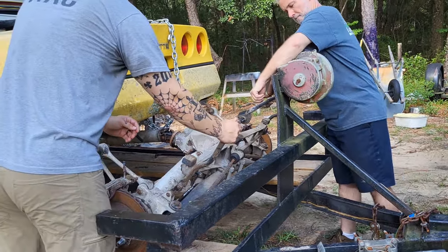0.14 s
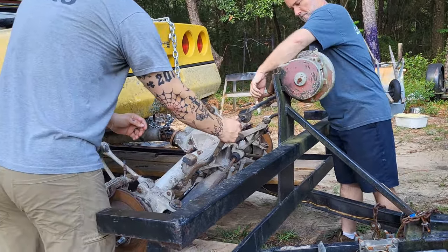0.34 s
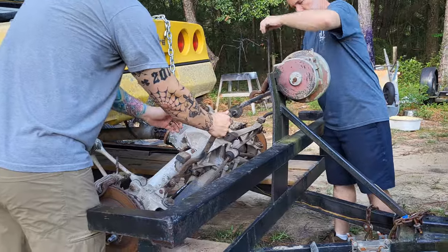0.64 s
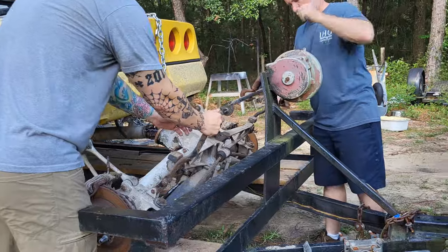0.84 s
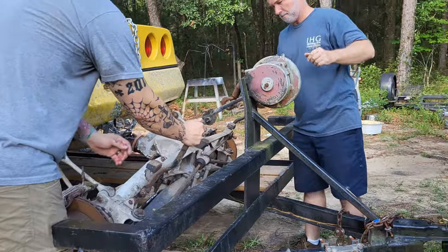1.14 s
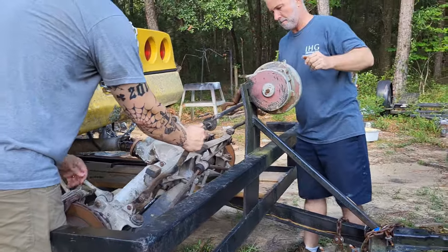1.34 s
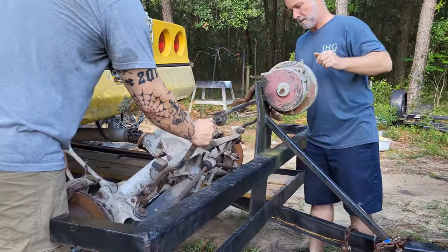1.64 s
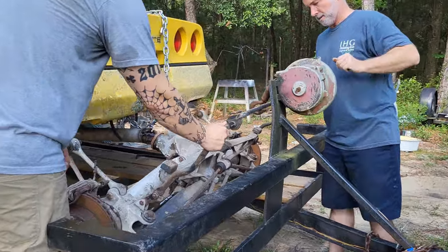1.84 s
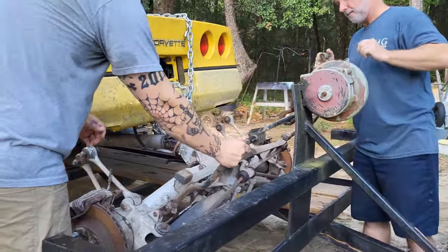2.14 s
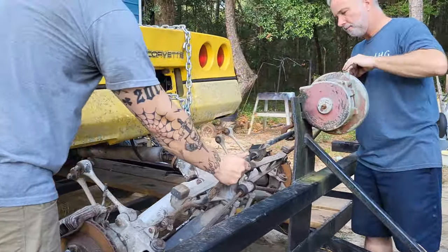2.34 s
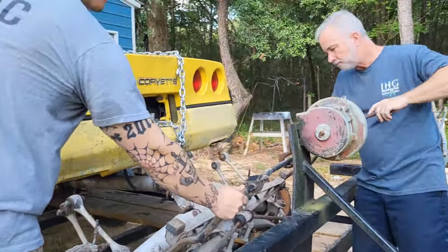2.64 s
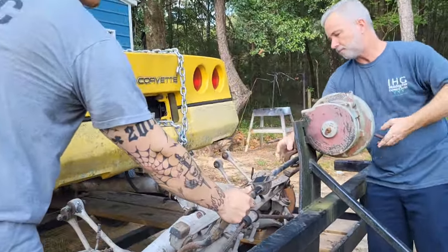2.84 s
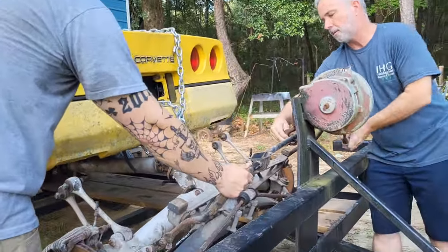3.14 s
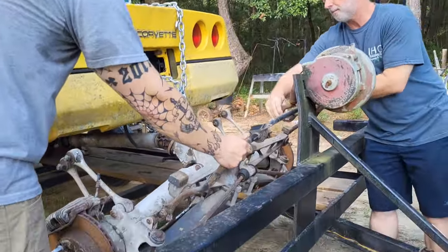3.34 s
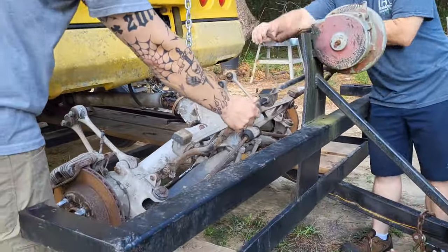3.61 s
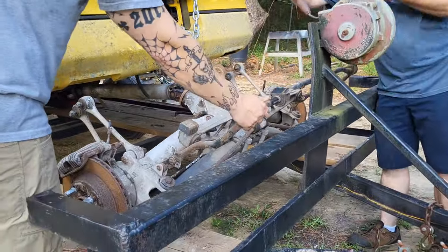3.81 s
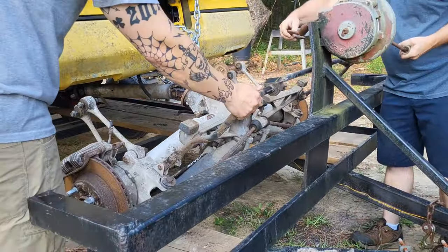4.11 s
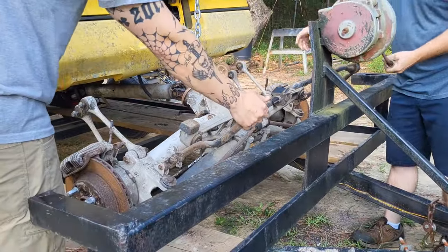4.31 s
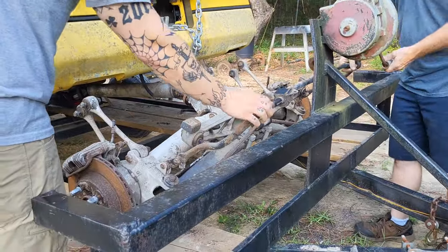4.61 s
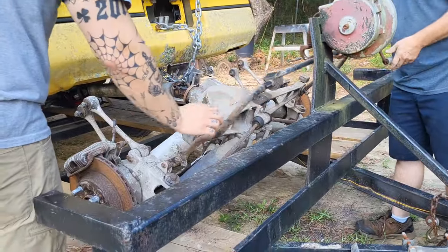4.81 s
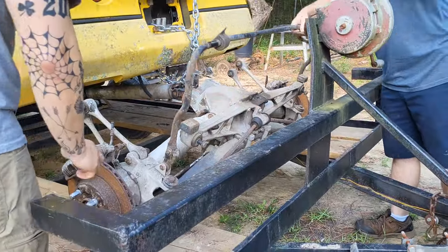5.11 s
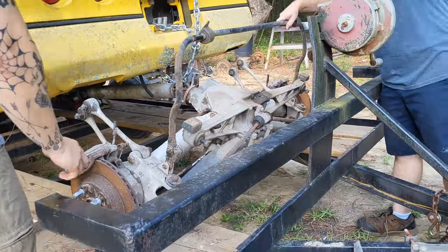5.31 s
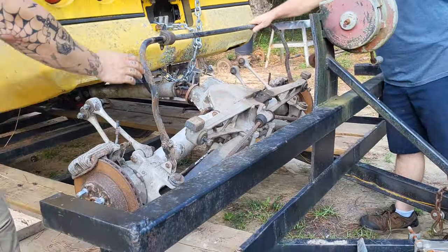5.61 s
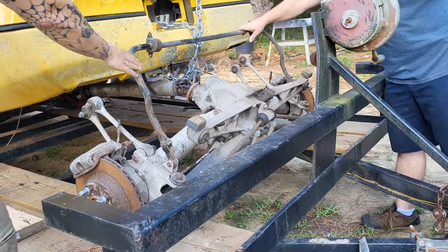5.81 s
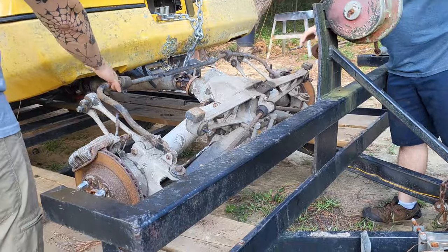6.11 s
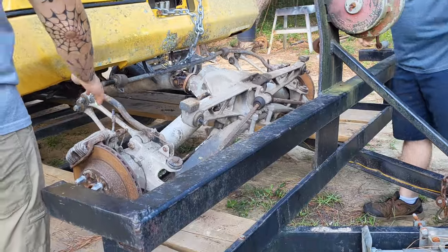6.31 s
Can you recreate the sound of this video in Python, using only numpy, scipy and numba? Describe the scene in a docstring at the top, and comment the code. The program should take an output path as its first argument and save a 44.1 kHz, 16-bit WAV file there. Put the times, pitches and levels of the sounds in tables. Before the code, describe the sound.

Dull handling bumps and breeze rumble over faint insects, scattered ratchet-like clicks, then short loud clanks of heavy steel parts and a chain slap.

```python
"""Low bumps of hands on a phone and a bird's chips come first, then hard steel ticks and heavy clanks.
The place is the edge of a wood: a car axle is shifted on a trailer beside a hand winch.
Steel is bursts of noise that set ringing tones going; bumps are short low waves over a noise rumble.
Chips are rising sine tones; leaves and insects are filtered noise; fading noise makes the echo."""
import sys
import numpy as np
from scipy import signal
from scipy.fft import rfft, irfft
from scipy.io import wavfile
from scipy.ndimage import uniform_filter1d
from numba import njit

SR = 44100
rng = np.random.default_rng(int(sys.argv[2]) if len(sys.argv) > 2 else 0)


def unload_audio(sound):
    """Save the sound as a 16-bit wav file, at the path given as the first command line argument."""
    columns = np.transpose(np.atleast_2d(sound))
    # keep every value between -1 and 1, then stretch to whole-number steps
    steps = np.round(np.clip(columns, -1, 1) * 32767)
    wavfile.write(sys.argv[1], SR, steps.astype(np.int16))


N = 284708  # length in samples

# Ticks of pawl and gear: start_s, rough_peak_db, rattle_s, centre_hz, filter_width_octaves
TICK_HITS = [(0.393, -43.5, .008, 3570, 5.7), (0.417, -38, 0.018, 3380, 7.5),
             (0.4932, -38, 0.031, 5500, 3.5), (0.515, -30.5, 0.0031, 6900, 2.5),
             (0.5244, -24, .007, 5070, 8.2), (0.678, -30, 0.007, 6600, 4.4),
             (0.8576, -31.5, 0.0055, 6650, 3.9), (0.9641, -31, .011, 3000, 11),
             (1.0385, -40, 0.0091, 3260, 6), (1.064, -28, 0.006, 3440, 7.6),
             (1.1787, -37, 0.013, 3550, 5.2), (1.2416, -42.5, 0.0084, 4330, 3.1),
             (1.289, -47, 0.019, 5830, 3.3), (1.328, -49, .006, 6300, 1.7), (1.465, -45, 0.0067, 2390, 4.7),
             (1.496, -30, 0.0099, 3700, 8.4), (1.528, -41, 0.015, 3160, 7.7),
             (1.633, -41, 0.0025, 3300, 1.6), (1.6848, -27.5, 0.0077, 3960, 7.1),
             (1.758, -34, 0.027, 6840, 3.9), (1.7774, -28, 0.0074, 2020, 2.3),
             (1.893, -23, 0.0045, 7200, 2.8), (2.1224, -37, 0.0031, 3770, 4.3),
             (2.1377, -45.5, 0.02, 3140, 5.6), (2.3048, -39, .003, 2510, 0.52),
             (2.4425, -18.5, 0.0019, 6100, 2.9), (2.4551, -27.5, 0.0057, 3380, 11),
             (2.497, -37, 0.011, 2610, 1.1), (2.551, -36, .003, 2915, 1.4), (2.607, -39, 0.006, 2220, 1.2),
             (2.6205, -36, 0.0027, 2020, 1.3), (2.667, -39.5, .008, 2740, 3.3),
             (2.722, -37, .007, 2270, 1.18), (3.0903, -40, 0.0067, 2290, 1.8),
             (3.306, -44.5, 0.0026, 2570, 0.36), (3.4318, -19.5, 0.0026, 4200, 2.1),
             (6.1493, -11, 0.0014, 2970, 4.4), (6.1568, -13, 0.0046, 2170, 3.5)]
# Chain links slapping the hook: start_s, rough_peak_db, rattle_s, centre_hz, filter_width_octaves
LINK_HITS = [(6.108, -16.5, 0.0044, 8750, 20), (6.122, -11, 0.0049, 7300, 9.6),
             (6.293, -24, 0.0037, 5350, 2.7), (6.304, -33.5, 0.0097, 7000, 10)]
# Heavy steel clanks: start_s, rough_peak_db, rattle_s, fade_s, centre_hz, filter_width_octaves,
# deck_boom_rough_peak_db, favoured_mode_hz
CLANK_HITS = [(1.066, -29, 0.0037, 0.042, 854, 2.3, -34, 1480), (1.199, -44, 0.13, 0.19, 390, 3, -46, 545),
              (1.533, -36, 0.018, 0.07, 393, 2.9, -42, 541),
              (1.772, -23.5, 0.004, 0.08, 600, 2.6, -47, 670),
              (1.811, -30.5, 0.01, 0.016, 2550, 1.5, -60, 3400),
              (1.843, -19.5, 0.006, 0.015, 2470, 1.6, -39.5, 2420),
              (1.989, -45, 0.012, 0.18, 1500, 10, -52, 2280), (2.226, -34.5, 0.01, 0.1, 1600, 4, -41, 3000),
              (2.748, -38, .0067, 0.0096, 460, 1.3, -62, 545),
              (3.771, -46, 0.061, 0.01, 850, .19, -58, 860),
              (3.824, -19.5, 0.021, 0.017, 1090, 2.96, -28.5, 630),
              (4.402, -12, .025, 0.026, 1800, 1.88, -29, 3320),
              (4.519, -19.5, 0.018, 0.019, 960, 2.86, -38, 897),
              (5.261, -9.5, 0.04, 0.014, 1420, 2.75, -31, 1390),
              (5.434, -15.5, 0.0037, 0.023, 1610, 2.74, -39.5, 3180),
              (5.45, -14, 0.0033, 0.0057, 860, 1.8, -48, 960),
              (6.133, -15.5, 0.0075, 0.01, 2700, 2.6, -38, 3270),
              (6.164, -16.5, 0.0051, 0.019, 610, 3, -37, 564),
              (6.236, -26.5, 0.013, .008, 1450, 1.7, -60, 1370)]
# Ringing tones ("modes") of four steel bodies: pitch_hz, relative_level_db, ring_s.
# ring_s is the time to fall 60 dB before the damping share of each kind of hit shortens it.
PAWL_MODES = [(2400, -5, .05), (2740, -2, .06), (3020, -5, .05), (3440, -5, .05), (3720, -6, .05),
              (4320, -9, .04), (4750, -5, .06), (5600, -9, .04), (6150, -6, .14), (6960, -5, .05),
              (7500, -4, .05), (8100, -6, .04), (9340, -8, .04), (10700, -11, .04)]  # pawl and gear
CHAIN_MODES = [(2050, -2, .05), (3020, -4, .08), (4760, -6, .08), (6100, -1, .1), (6960, -8, .08),
               (8100, 2, .08), (9340, -10, .06), (10700, -12, .06), (13300, 6, .09), (13760, 1, .08),
               (14200, 0, .07), (14650, 0, .07)]
AXLE_MODES = [(545, -6, .15), (600, -7, .12), (692, -5, .2), (785, -8, .12), (860, -2, .15), (925, -2, .15),
              (982, 0, .2), (1135, -8, .12), (1191, -4, .12), (1272, 3, .2), (1326, -1, .12),
              (1460, -4, .12), (1766, -6, .1), (1820, -3, .17), (2000, -5, .12), (2186, -4, .11),
              (2312, -1, .16), (2433, -3, .16), (2550, 0, .13), (2907, -5, .1), (3122, 0, .13),
              (3350, -5, .13), (3722, -4, .13), (4050, -8, .08), (4550, -5, .08), (4850, -8, .1),
              (5400, -9, .09), (6100, -9, .08)]  # axle and arms
DECK_MODES = [(130.5, -9, 0.66), (222.6, 0.5, 0.48), (416.4, 6, 0.3)]  # trailer deck
# Strong bumps on the phone body, before overtones and low cut: middle_s, peak_db, pitch_hz
BODY_BUMPS = [(0.024, -14, 95), (0.126, -18, 95), (0.408, -19, 106), (0.466, -19.5, 101), (0.65, -23, 63),
              (0.707, -24, 82.4), (0.908, -27, 105), (1.037, -16.5, 115), (1.074, -21, 69),
              (1.172, -23.5, 82.1), (1.29, -32.5, 60), (1.508, -23, 80.5), (1.646, -20.5, 112),
              (1.792, -25.5, 108), (2.067, -16, 117), (2.13, -21.5, 126), (2.176, -23, 114.3),
              (2.227, -32, 70), (2.313, -26.5, 80), (2.454, -12, 104), (2.468, -10.5, 113),
              (2.503, -12, 83), (2.519, -11, 57.6), (2.576, -17.5, 125), (2.616, -16, 105.2),
              (2.687, -16.5, 103), (2.714, -21, 105.5), (2.944, -24, 102), (3.438, -20, 85)]
# Spells of fumbling, each a train of smaller bumps: start_s, length_s, typical_peak_db
FUMBLE_SPELLS = [(.04, .14, -24.5), (.42, 0.097, -26), (.55, 0.092, -32.5), (1.05, .11, -30.5),
                 (1.53, .1, -33.5), (2.08, 0.19, -26.5), (2.55, 0.26, -28.5)]
# Breeze on the microphone ports, before its flutter: time_s, level_db
BREEZE_LEVEL = [(0, -32.5), (.2, -48.5), (.4, -37.5), (.75, -42.5), (1, -44), (1.6, -43.5), (1.95, -40.5),
                (2.3, -38), (2.42, -45.5), (2.55, -30.5), (2.72, -39), (2.85, -48), (3.2, -55.5),
                (3.5, -45.5), (3.65, -57.5), (4.3, -50), (5.2, -64), (6.46, -61)]
# Colour of the breeze rumble: frequency_hz, relative_level_db
BREEZE_COLOUR = [(12, -29), (20, -64), (43, 10), (107, -7), (168, 0), (222, -28.5), (323, -18),
                 (400, -26.5), (520, -18.5), (880, -120)]
# Bird chips: time_s (2 ms after the chip starts), peak_db
BIRD_CHIPS = [(0.0835, -38), (0.118, -41), (1.9872, -36), (2.0234, -40), (3.6835, -41.5), (3.715, -43),
              (5.1537, -54.5)]
# Colour of the distant air and leaves: frequency_hz, relative_level_db
WOOD_COLOUR = [(25, -36), (45, -21), (70, 10), (130, 4.5), (200, -1.5), (320, -8), (640, -5.5),
               (1300, -14.5), (2500, -20), (3600, -23.5), (6500, -30), (10000, -30), (16000, -30.5)]
# Insect choruses, level before flicker: centre_hz, filter_width_hz, level_db, flicker_db, flicker_per_s
INSECT_BANDS = [(8450, 1680, -58.5, 1, 42), (2910, 380, -71.5, -1, 3.8)]
# Echo from trees and trailer deck: frequency_hz, time_to_fall_60_db_s
ECHO_DECAY = [(150, 1), (1000, 0.17), (3000, 0.63), (7000, 0.25), (15000, 0.42)]

RISE_S = .002  # contacts build up over this time
TICK_FADE, LINK_FADE = 2.16, 1.36  # fade times, in rattle lengths
TICK_BRIGHT = 1.03  # first contacts start from this many times the centre
CLANK_BRIGHT = .27  # first contacts start above the centre by this share of the width
LIGHT_HZ = 1720  # small parts radiate little below this
BUMP_CYCLES = 0.51  # half length of a bump, in cycles
FUMBLE_GAP_S, FUMBLE_HZ = .021, 97.3  # typical spacing and pitch
FUMBLE_SPREAD, FUMBLE_SCATTER_DB = 0.15, 2.5  # random spread of pitch (share) and level
CHIP_FROM_HZ, CHIP_TO_HZ, CHIP_S = 5750, 7750, .009
WOOD_DB = -50.5  # loudness of air and leaves before their flutter
TOP_HZ = 15800  # the phone cuts everything above this


def ticks():
    """Small hard pawl and gear parts hit: bright and short, ringing most near one pitch."""
    out = np.zeros(N)
    for s, db, rattle_s, hz, octaves in TICK_HITS:
        modes = favour(PAWL_MODES, hz, 6, .12)
        hit = blow(db, rattle_s, TICK_BRIGHT * hz, hz, octaves, TICK_FADE * rattle_s, modes,
                   damp=.65, crack_db=3.5, grain_db=1.9, snap=1.2)
        add(out, s, hit)
    return out


def links():
    """Chain links slap the hook: a crack of noise with the chain's own modes."""
    out = np.zeros(N)
    for s, db, rattle_s, hz, octaves in LINK_HITS:
        hit = blow(db, rattle_s, hz, hz, octaves, LINK_FADE * rattle_s, CHAIN_MODES,
                   damp=.4, crack_db=-1, grain_db=2.2)
        add(out, s, hit)
    return out


def light_steel():
    """Small parts are poor at sending out low sound, so ticks and links get a low cut."""
    low_cut = signal.butter(2, LIGHT_HZ, "high", fs=SR, output="sos")
    return signal.sosfilt(low_cut, ticks() + links())


def clanks():
    """Heavy loose arms knock on the axle; the deck under it booms a little later."""
    out, t = np.zeros(N), np.arange(int(.6 * SR)) / SR
    for s, db, rattle_s, fade_s, hz, octaves, deck_db, mode_hz in CLANK_HITS:
        first_hz = hz * 2 ** (CLANK_BRIGHT * octaves)
        modes = favour(AXLE_MODES, mode_hz, 7, .15)
        hit = blow(db, rattle_s, first_hz, hz, octaves, fade_s, modes,
                   damp=.42, crack_db=-2, grain_db=1.7, snap=.6)
        add(out, s, hit)
        # the push on the deck swells before it fades
        shove = rng.standard_normal(len(t)) * t * np.exp(-t / 0.019)
        boom = strike(shove, DECK_MODES, damp=.45)
        add(out, s, peak(boom, deck_db, 0.093))
    return out


def blow(db, rattle_s, first_hz, centre_hz, octaves, fade_s, modes, damp, crack_db, grain_db, snap=0):
    """Parts chatter together for rattle_s, then let go; the contacts ring the modes and crack directly."""
    t = np.arange(int(.4 * SR)) / SR
    white = rng.standard_normal(len(t))
    rattle_s = max(rattle_s, .001)
    let_go = np.exp(-np.maximum(t - rattle_s, 0) / max(fade_s, .002))
    push = np.minimum(t / RISE_S, 1) * let_go
    push = push * (1 + snap * np.exp(-t / 0.0035))  # extra strength at first touch, for ticks and clanks
    # grains of 40 samples, each with its own random strength
    sizes = np.repeat(rng.exponential(size=len(t) // 40 + 1), 40)[:len(t)]
    contacts = white * push * undb(grain_db * sizes)
    # the centre glides from first_hz to centre_hz: stiff first contacts of ticks and clanks are brighter
    glide = np.exp(-1.5 * t / rattle_s)
    hz = np.clip(centre_hz * (first_hz / centre_hz) ** glide, 100, .4 * SR)
    k = max(octaves, .2) * np.log(2)
    for width in (k, k, 2 * k):
        contacts = svf(contacts, hz, width)
    ringing = strike(contacts, modes, damp)
    crack = level(contacts, crack_db)
    return peak(ringing + crack, db, rattle_s + 0.0029)


def strike(x, modes, damp):
    """Each blow lands on a new spot, so it wakes the modes in new shares."""
    f, db, t60 = np.transpose(modes)
    detune = 1 + .001 * rng.standard_normal(len(f))
    share_db = 2.5 * rng.standard_normal(len(f))
    turn = 2j * np.pi * f * detune / SR
    decay = np.log(1000) / (damp * t60 * SR)
    return level(ring(x, np.exp(turn - decay), undb(db + share_db)), 0)


def favour(modes, hz, db, octaves):
    """The spot that is hit lifts the modes around one pitch."""
    f, mode_db, t60 = np.transpose(modes)
    distance = np.log2(f / hz) / octaves
    return np.transpose([f, mode_db + db * np.exp(-distance ** 2), t60])


@njit
def ring(x, poles, gains):
    """A bank of modes driven by x: each is a spinning number that shrinks at every sample."""
    y = np.zeros(len(x))
    for m in range(len(poles)):
        z = 0j
        for i in range(len(x)):
            z = z * poles[m] + x[i]
            y[i] += gains[m] * z.imag
    return y


def handling():
    """Short low wobbles of the phone body over a lumpy breeze rumble."""
    return bumps() + breeze()


def bumps():
    """Each bump is a low wave under a bell-shaped swell; uneven give of the membrane adds overtones."""
    out, t = np.zeros(N), np.arange(-2000, 2000) / SR
    for s, db, hz in list(BODY_BUMPS) + fumbling():
        swell = np.exp(-(t * hz / BUMP_CYCLES) ** 2)
        phase = 2 * np.pi * rng.random()
        wobble = undb(db) * swell * np.cos(2 * np.pi * hz * t + phase)
        start_s = s + t[0]
        before_start = max(-int(start_s * SR), 0)  # samples that fall before time zero
        add(out, start_s, wobble[before_start:])
    # the membrane gives less one way than the other, heard most on strong bumps
    out = out + 1.57 * out ** 2
    return signal.sosfilt(signal.butter(2, 35, "high", fs=SR, output="sos"), out)


def fumbling():
    """Uneven trains of small bumps, as rows of middle_s, peak_db, pitch_hz."""
    rows = []
    for start_s, length_s, db in FUMBLE_SPELLS:
        late, size, pitch = rng.standard_normal((16, 3)).T
        s = FUMBLE_GAP_S * (np.arange(len(late)) + 0.227 * late)
        peaks_db = db + FUMBLE_SCATTER_DB * size
        hz = FUMBLE_HZ * np.exp(FUMBLE_SPREAD * pitch)
        train = np.transpose([start_s + s, peaks_db, hz])
        rows += list(train[s <= length_s])
    return rows


def breeze():
    """Breeze on the microphone ports: coloured noise with a slow level curve and a quick flutter."""
    s, db = np.transpose(BREEZE_LEVEL)
    gust_db = np.interp(np.arange(N) / SR, s, db) + 3.5 * walk(22)
    return undb(gust_db) * level(colour(rng.standard_normal(N), BREEZE_COLOUR), 0)


def bird():
    """Each chip is a quick whistle: a sine that sweeps up in a few ms."""
    out, t = np.zeros(N), np.arange(int(CHIP_S * SR)) / SR
    hz = CHIP_FROM_HZ + (CHIP_TO_HZ - CHIP_FROM_HZ) * np.sin(np.pi / 2 * t / t[-1])
    whistle = np.sqrt(np.hanning(len(t))) * np.sin(2 * np.pi * np.cumsum(hz) / SR)
    for s, db in BIRD_CHIPS:
        add(out, s - .002, undb(db) * whistle)
    return out


def echo(x, db, build_s):
    """Scattered returns from trees and deck: noise bands that build up, each dying at its own pace."""
    t, tail = np.arange(int(.8 * SR)) / SR, 0
    hz, t60 = np.transpose(ECHO_DECAY)
    for f in 150 * 2. ** np.arange(7):  # one band per octave
        band = svf(rng.standard_normal(len(t)), np.full(len(t), f), 0.92)
        band_t60 = np.interp(np.log(f), np.log(hz), t60)
        tail = tail + band * undb(-60 * t / band_t60)
    tail = tail * (1 - np.exp(-t / build_s))
    tail = tail * undb(db) / np.sqrt(np.sum(tail ** 2))
    return signal.fftconvolve(x, tail)[:N]


def wood():
    """Distant air and leaves: coloured noise whose level wavers a little."""
    return level(colour(rng.standard_normal(N), WOOD_COLOUR), WOOD_DB) * undb(0.87 * walk(16.0))


def insects():
    """Choruses of insects: noise squeezed into narrow bands, each flickering in level."""
    out = np.zeros(N)
    for hz, width_hz, db, flicker_db, rate in INSECT_BANDS:
        band = rng.standard_normal(N)
        for _ in range(4):  # repeated filtering steepens the sides of the band
            band = svf(band, np.full(N, 1. * hz), width_hz / hz)
        out += level(band, db) * undb(flicker_db * walk(rate))
    return out


def undb(db):
    """Turn dB into a gain."""
    return 10 ** (np.asarray(db) / 20)


def level(x, db):
    """Set the average strength (rms) of a sound."""
    return x * undb(db) / np.sqrt(np.mean(x ** 2))


def peak(x, db, within_s):
    """Set the rms of a hit's opening 10 dB below db, so that it peaks near db."""
    opening = x[:int(within_s * SR)]
    return x * undb(db - 10) / np.sqrt(np.mean(opening ** 2))


def add(out, s, x):
    """Mix a sound in from time s."""
    i = max(int(s * SR), 0)
    out[i:i + len(x)] += x[:N - i]


def colour(x, table):
    """Shape a spectrum by frequency_hz, level_db points."""
    hz, db = np.transpose(table)
    f = np.maximum(np.fft.rfftfreq(len(x), 1 / SR), 1)
    gain = undb(np.interp(np.log(f), np.log(hz), db))
    return irfft(rfft(x) * gain, len(x))


def walk(rate):
    """Random values around zero, about rate of them a second, smoothed twice."""
    k = int(SR / rate)
    steps = np.repeat(rng.standard_normal(N // k + 1), k)
    return 0.64 * uniform_filter1d(uniform_filter1d(steps, k), k)[:N]


@njit
def svf(x, hz, k):
    """Band-pass filter whose centre can move every sample; k = width / centre."""
    y, b, l = np.empty(len(x)), 0., 0.
    for i in range(len(x)):
        g = np.tan(np.pi * hz[i] / SR)
        v = (b + g * (x[i] - l)) / (1 + g * (g + k))
        b, l, y[i] = 2 * v - b, l + 2 * g * v, k * v
    return y


def scene():
    """Nearly mono: hits and the highest hiss reach the two ports a little differently."""
    steel, chips = light_steel() + clanks(), bird()
    far = wood() + insects() + echo(steel, -15, 0.013) + echo(chips, -2.0, 0.0075)
    t = np.arange(200) / SR
    smear = undb(-40) * rng.standard_normal(len(t)) * np.exp(-t / 0.00029)
    unlike = signal.fftconvolve(steel, smear)[:N]
    hiss = svf(rng.standard_normal(N), np.full(N, 13000.), 0.39)
    unlike = unlike + level(hiss, -86.0)
    # the unlike part is added on one side and taken away on the other
    return steel + chips + far + handling() + unlike * np.array([[1], [-1]])


def record(dry):
    """The upper band drops out just after the strongest bass; the phone cuts the top."""
    low = signal.sosfiltfilt(signal.butter(4, 650, fs=SR, output="sos"), dry)
    bass = uniform_filter1d(np.abs(svf(low[0], np.full(N, 80.), 4.2)), int(0.047 * SR))
    bass_db = 20 * np.log10(bass + 1e-9)
    late_bass_db = np.roll(bass_db, int(0.018 * SR))
    # 4.5 dB of drop for each dB of bass above -27 dB
    upper_gain = undb(-4.5 * np.maximum(late_bass_db + 27.0, 0))
    top = signal.ellip(10, .2, 80, TOP_HZ, fs=SR, output="sos")
    return signal.sosfilt(top, low + upper_gain * (dry - low))


dry = scene()
out = record(dry)
unload_audio(out)
```